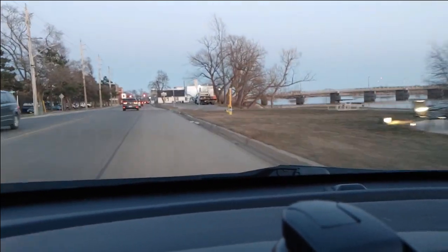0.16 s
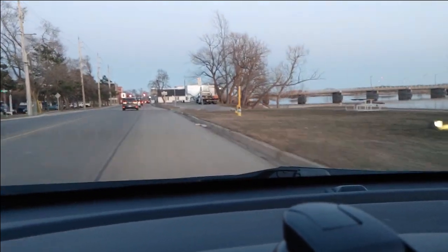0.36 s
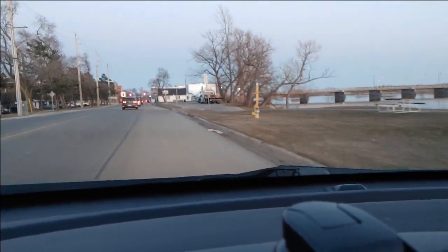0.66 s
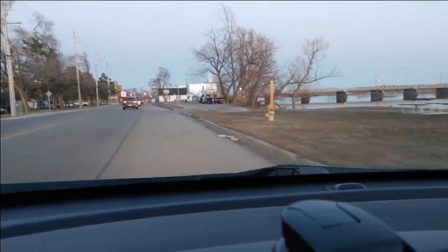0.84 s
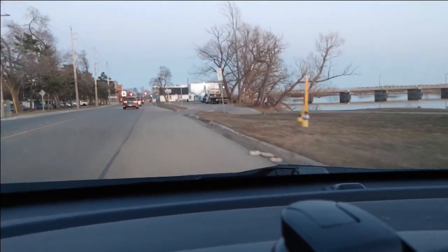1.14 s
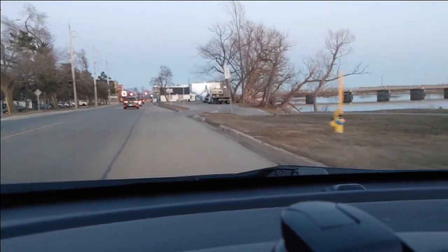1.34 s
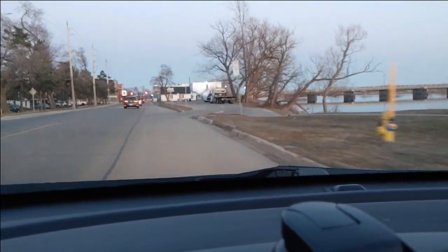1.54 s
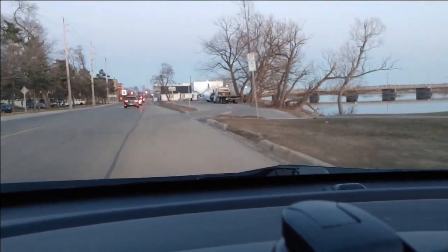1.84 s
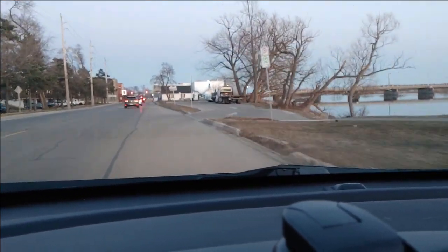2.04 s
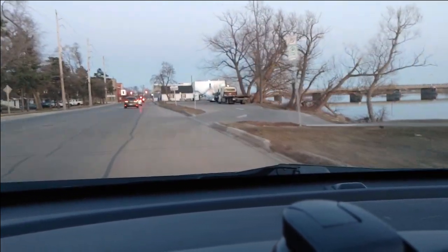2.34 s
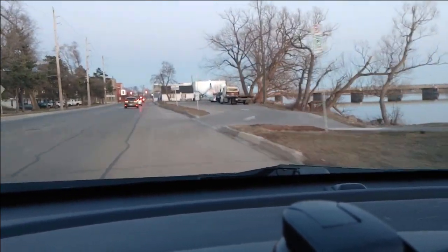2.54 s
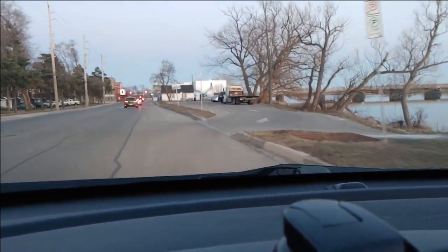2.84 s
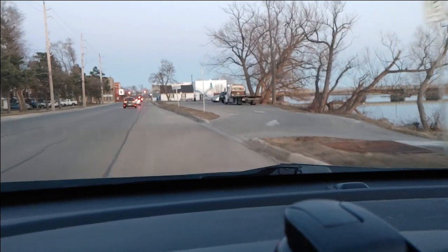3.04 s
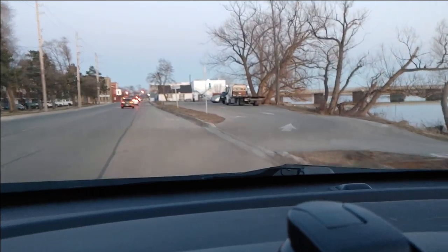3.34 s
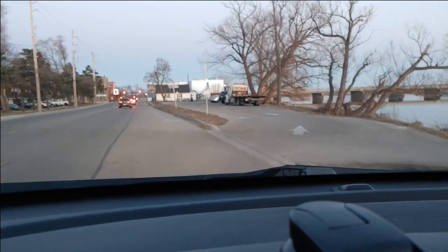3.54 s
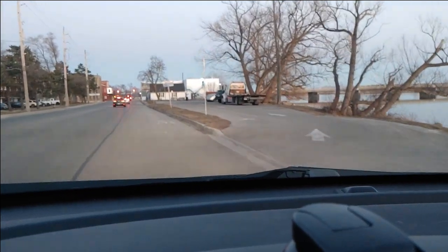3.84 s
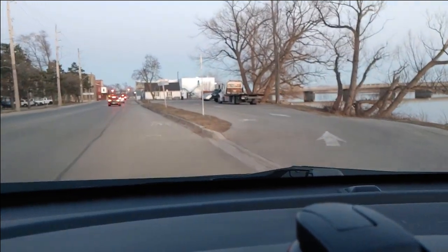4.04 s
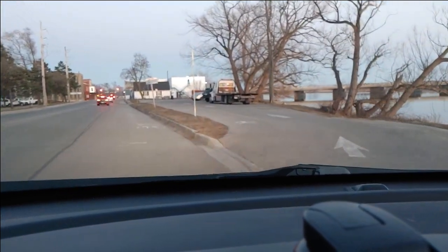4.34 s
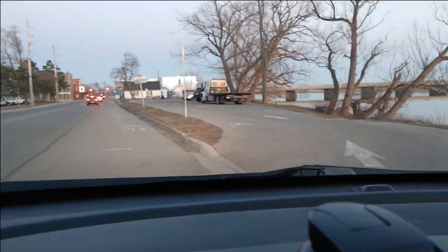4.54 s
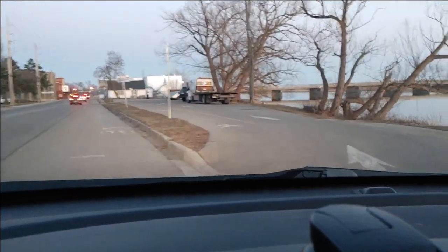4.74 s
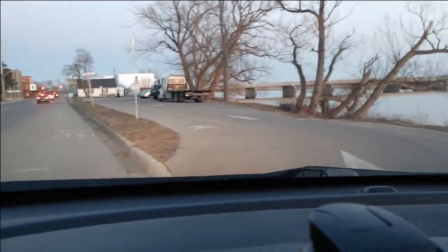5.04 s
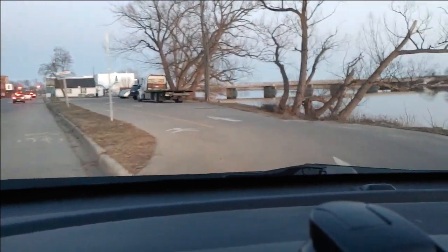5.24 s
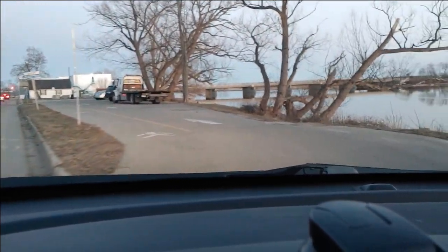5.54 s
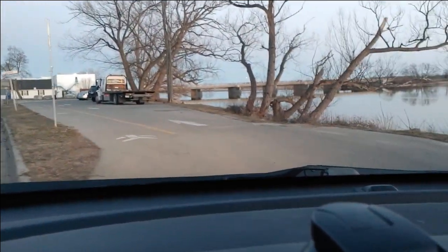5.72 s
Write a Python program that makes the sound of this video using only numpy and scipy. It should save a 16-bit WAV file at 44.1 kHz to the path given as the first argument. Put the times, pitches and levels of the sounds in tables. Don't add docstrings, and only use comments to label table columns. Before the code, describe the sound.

Inside a closed car, heard close to the dashboard in wide stereo, for nearly six seconds. From the start a hollow, wavering tyre hum around 320-400 Hz lies over low road rumble and faint air hiss. Soft joint thuds come at 0.2-0.5 s. At about 1.36-1.44 s the indicator stalk snaps over with a double plastic clack; from 1.8 s the relay ticks every 0.7 s, each followed by a tock about 0.36 s later. The hum keeps sliding down, making panels boom as it passes their pitches. Between 2.3 and 3.1 s the engine climbs gently while a hand rubs the wheel. A strong double thud lands at 3.35 s, a crisp plastic snap at 4.35 s. The engine coasts down from 3.9 to 5 s; skin and cuff rustle at 4.5-5.5 s with small creaks. The road fades towards a soft blower hum, with a last soft bump at 5.7 s.

```python
import sys
import numpy as np
from scipy import signal
from scipy.fft import rfft, irfft
from scipy.io import wavfile
from scipy.ndimage import map_coordinates

SR = 44100
rng = np.random.default_rng(int(sys.argv[2]) if len(sys.argv) > 2 else 0)


def volts(x):
    e = np.asarray(x, float) / 20
    return 10 ** e


def to_wav(s):
    ch = np.atleast_2d(s).T
    pcm = np.round(np.clip(ch, -1, 1) * 32767)
    wavfile.write(sys.argv[1], SR, pcm.astype(np.int16))


N = 259308
HZ = np.maximum(np.arange(N // 2 + 1) * SR / N, 1)
CRUISE_TURNS_PER_S = 6.7


def rms_one(x):
    return x / np.sqrt(np.mean(x ** 2) + 1e-20)


def in_time(rows):
    time_s, *columns = np.transpose(rows)
    return [np.interp(np.arange(N) / SR, time_s, column) for column in columns]


def at_hz(points):
    hz, value = np.transpose(points)
    return np.interp(np.log(HZ), np.log(np.maximum(hz, 1)), value)


def add(out, start_s, sound):
    i = round(start_s * SR)
    out[..., i:i + sound.shape[-1]] += sound[..., :N - i]


def drift(rate, step=1):
    r = np.exp(-80 * np.pi * rate / SR)
    chance = rng.standard_normal(N // 40 + 2002)
    slow = signal.lfilter([1], [1, -2 * r, r * r], chance)[2000:]
    return np.interp(np.arange(0, N, step) / 40, np.arange(len(slow)), rms_one(slow))


def resonance(x, hz, width_hz):
    r = np.exp(-np.pi * width_hz / SR)
    zeros = np.array([1, 0, -1]) * (1 - r * r) / 2
    return signal.lfilter(zeros, [1, -2 * r * np.cos(2 * np.pi * hz / SR), r * r], x)


def body(x, modes):
    return sum((-1) ** k * volts(db) * resonance(x, hz, width_hz) for k, (hz, width_hz, db) in enumerate(modes))


def noise(spectrum, patchy_db):
    _, _, cells = signal.stft(rng.standard_normal((2, N)), nperseg=1024)
    frames = cells.shape[-1]
    coarse = rng.standard_normal((44, frames // 6 + 2))
    row = 43 * np.log1p(np.arange(513)) / np.log(514)
    place = np.meshgrid(row, np.arange(frames) / 6, indexing="ij")
    patches = volts(patchy_db * map_coordinates(coarse, place, order=1))
    mottled = signal.istft(cells * patches, nperseg=1024)[1][:, :N]
    coloured = irfft(rfft(mottled) * volts(at_hz(spectrum)), N)
    return rms_one(coloured * volts(.6 * drift(9)))


def stroke_db(t, peak_s, peak_db, swell_s, fade_s):
    contact_db = peak_db - 20 * ((t - peak_s) / np.where(t < peak_s, swell_s, fade_s)) ** 2
    return np.maximum(contact_db, -200)


TREAD_DB = [-9.5, -19.5, -8.5, -11.5, -8, -6.5, 0, -1.3, -9, -5, 3.2, -5, -3.5, -1, -12, -7.5, -8, -7, -12,
            -13]
# crest_s, lift_db, length_s
ORDER_SWELLS = [(0.14, 4, .7), (.25, 5.5, .6), (.95, 3, 0.93), (1.35, 6, .6), (1.5, 4.5, 0.5),
                (1.85, 5.5, .7), (2.1, 3, .6), (2.2, 4.5, .6), (2.6, 10.5, 0.93), (1.7, 9, .5),
                (1.8, -4.5, .8), (.4, -5, .9)]
SWELLING_ORDERS = [58, 48, 54, 55, 59, 61, 54, 65, 64, 56, 58, 50]
FIRST_ORDER = 48


def tread(turns, waver_db):
    angle = 2 * np.pi * np.cumsum(turns)[::12] / SR
    t = np.arange(len(angle)) * 12 / SR
    out = 0
    for k, db in enumerate(TREAD_DB):
        order = FIRST_ORDER + k
        for (crest_s, lift_db, length_s), swelling in zip(ORDER_SWELLS, SWELLING_ORDERS):
            if swelling == order:
                db = db + lift_db * np.cos(np.pi * np.clip((t - crest_s) / length_s, -.5, .5))
        phase = order * angle + np.pi * k ** 3 / 11 + .25 * drift(.8, 12)
        pair = np.sin(order // 2 * angle + rng.uniform(0, 2 * np.pi))
        shape = np.sin(phase) + volts(-10.5) * pair + volts(-10.5) * np.sin(2 * phase)
        waver = drift(1, 12) + .5 * np.array([drift(1, 12), drift(1, 12)])
        out = out + volts(db + waver_db * waver) * shape
    full = signal.resample_poly(out, 12, 1, axis=1)[:, :N]
    return rms_one(signal.sosfiltfilt(signal.butter(4, 425, fs=SR, output="sos"), full))


# pitch_hz, width_hz, level_db
CABIN = [(93.2, 25, 0.5), (144.8, 18, 3), (171.9, 15.9, 2), (234.4, 15.7, 3.5), (287.7, 12, 2.5),
         (331.4, 31, 7.5), (373, 56, 1.5)]


def cabin(x):
    run_in = np.concatenate([2 * x[..., :1] - x[..., 4000:0:-1], x], axis=-1)
    return body(run_in, CABIN)[..., 4000:]


# pitch_hz, density_db (per Hz)
RUMBLE = [(12, -48), (20, -20), (50, -10.5), (92, -7.5), (140, -2), (190, -12.5), (260, -26), (600, -80.5)]
# pitch_hz, density_db (per Hz)
DRONE = [(130, -20), (175, -1.5), (232, 3), (262, -2.5), (310, 5), (390, 0.5), (425, -14), (494, -12),
         (600, -19.5), (884, -22.5), (1160, -27), (1290, -34), (1700, -46), (2600, -95)]
# pitch_hz, density_db (per Hz)
FAN = [(320, -31.5), (450, -22.5), (562, -4.5), (686, -7.5), (1280, -14), (1460, -10.5), (1660, -32),
       (1730, -21.5), (2000, -22), (2600, -55), (4400, -120)]
ROAD_PATCHY_DB = 3.2


def road(speed_db, coarse_db):
    rumble = volts(-51.5 + coarse_db + 11.5) * noise(RUMBLE, ROAD_PATCHY_DB)
    drone_db = -50.5 + 1.7 * speed_db + .21 * coarse_db
    drone = volts(drone_db + 18) * noise(DRONE, ROAD_PATCHY_DB)
    blower = volts(-71.5 + 1) * noise(FAN, ROAD_PATCHY_DB)
    return rumble * volts(-8.5) + cabin(rumble) + drone + blower


# pitch_hz, density_db (per Hz)
RUSH = [(880, -22), (1500, -6.5), (2110, -11), (2670, -8.5), (4090, -17), (5510, -28.5), (7910, -31.5),
        (8980, -28), (11400, -33), (13000, -44.5)]
HISS_PATCHY_DB = 2.3


def rush(turns, speed_db, dull, bright):
    sleeve = bright ** 2 / dull * volts(-14)
    level = np.hypot(volts(-77 + .79 * speed_db), sleeve)
    hiss = level * volts(4) * noise(RUSH, HISS_PATCHY_DB)
    hiss += volts(-2 - 50 * (turns - 6.35) ** 2) * resonance(hiss, 2720, 90) * 1.6
    hiss[1] = volts(-7.5) * (2.34 * hiss[1] - .35 * hiss[0])
    return hiss


# pitch_hz, width_hz, level_db (at cruising speed)
CAVITY = [(232, 9, -45), (287, 10, -52)]


def cavity(speed_db):
    out = 0
    for hz, width_hz, db in CAVITY:
        ring = resonance(resonance(rng.standard_normal(N), hz, width_hz), hz, width_hz)
        out = out + volts(db) * rms_one(ring)
    return out * volts(.81 * speed_db + .94 * drift(2.3))


# crest_s, peak_db, pitch_hz, length_s
BOOMS = [(.15, -34, 232.3, .16), (.35, -32, 231.5, .18), (.53, -33.5, 229.9, 0.17), (.91, -35, 224.8, 0.16),
         (.99, -32, 178.2, 0.29), (1.27, -38, 173.6, 0.16), (2.82, -31.5, 234, 0.12),
         (2.93, -32.5, 233.6, .1), (3.14, -32, 244.2, .22), (3.32, -24.5, 234.5, 0.25),
         (3.58, -20, 229.4, .08), (3.68, -23, 233.4, .17), (3.91, -27.5, 227.4, .16),
         (4.05, -27.5, 178.8, 0.32), (4.13, -27, 233.6, .14), (4.27, -29, 174.2, 0.21),
         (4.48, -34, 175.4, .14), (4.6, -30.5, 174.3, .16), (4.87, -25.5, 144.8, .26),
         (5.38, -38, 116.7, .14), (2.71, -31, 313, .2), (2.5, -34, 322, .2), (2.7, -38, 180, .25),
         (4.219, -38.5, 74.9, .12), (4.491, -38.5, 70, .1), (5.3, -32.5, 98.5, .3), (3.68, -33, 177, .14)]


def booms():
    out = np.zeros(N)
    for crest_s, db, hz, length_s in BOOMS:
        t = np.arange(round(length_s * SR)) / SR
        add(out, crest_s - length_s / 2, volts(db) * np.sin(np.pi * t / length_s) * np.sin(2 * np.pi * hz * t))
    return out


# start_s, peak_db, pitch_hz, t60_s
BUMPS = [
    (0.179, -23, 107.5, 0.087),
    (0.256, -19, 182, 0.15),
    (.3, -20.5, 113.9, 0.24),
    (0.5, -16, 110, 0.14),
    (3.345, -18.5, 171.9, 0.16),
    (3.362, -12, 97.6, 0.14),
    (5.72, -26.5, 93.2, 0.15),
    (5.704, -35, 62.5, 0.15),
]


def bumps():
    out, t = np.zeros(N), np.arange(SR // 3) / SR
    for start_s, db, hz, t60_s in BUMPS:
        push = volts(db - 60 * t / t60_s) * (1 - np.exp(-t / .014))
        add(out, start_s, push * 2 * np.sin(2 * np.pi * hz * t))
    return out


# start_s, peak_db, centre_hz,
# width_hz, t60_s
DETENTS = [(1.3555, -72, 3800, 900, .05), (1.3641, -46, 3500, 1500, 0.055), (1.3645, -51, 7460, 900, 0.054),
           (1.366, -51.5, 1390, 1186, 0.077), (1.374, -49.5, 5500, 3900, 0.064),
           (1.385, -44.5, 880, 650, 0.045), (1.426, -53, 4500, 6000, 0.048),
           (1.4335, -48, 5600, 4000, 0.068), (1.4335, -47.5, 3130, 980, 0.07),
           (1.4376, -39, 1070, 800, 0.074), (1.4325, -47, 1200, 700, .05), (1.426, -51, 1300, 400, 0.045),
           (1.6, -46, 1100, 250, .06), (1.44, -37.5, 472, 199, 0.18), (1.455, -56, 4330, 503, 0.043),
           (1.455, -59.5, 6600, 4000, .08), (3.638, -59.5, 2600, 1300, 0.054),
           (3.639, -47.5, 1010, 910, 0.042), (3.638, -54.5, 5230, 500, .025),
           (3.64, -65, 5600, 2500, 0.054), (4.341, -44, 4250, 700, 0.03), (4.3442, -50, 6000, 9000, .03),
           (4.3476, -35.5, 4300, 4900, 0.025), (4.352, -39, 4700, 5500, 0.068),
           (4.348, -37, 2150, 900, 0.053), (4.348, -41, 1000, 900, 0.061), (4.35, -50, 11500, 2300, 0.06),
           (4.348, -24.5, 15100, 1246, .01), (2.0682, -51.5, 7350, 900, .03),
           (2.0685, -58.5, 6300, 500, .045), (2.0685, -53, 4630, 460, .025),
           (2.069, -64.5, 2750, 510, 0.059), (2.073, -64, 3800, 2500, 0.047), (.261, -46, 900, 450, .06),
           (.257, -54.5, 1550, 210, 0.056), (4.3478, -26.5, 5600, 5800, .004),
           (4.3488, -25.5, 4300, 4800, .004), (4.3502, -29.5, 5300, 6200, .004), (.256, -48, 590, 180, .07)]
# start_s, peak_db, centre_hz
CREAKS = [(.2445, -78, 3750), (4.801, -59, 2710), (.955, -53.5, 1117), (1.278, -71.5, 4100),
          (1.59, -57, 800), (3.339, -65.5, 2720), (3.613, -61, 853), (3.755, -62, 2900), (3.755, -72, 4500),
          (3.857, -68.5, 2720), (4.92, -55.5, 2850), (4.945, -55, 2870), (5.855, -59, 1350),
          (5.854, -68, 2920)]
# pitch_hz, width_hz, level_db
SHROUD = [(950, 130, 1.5), (1402, 41, 3), (2340, 540, -6.5), (2605, 54, 2), (2860, 110, 0.5),
          (3400, 150, 3), (3680, 210, 2.5), (4300, 320, 5), (4770, 140, -2), (5180, 270, 3),
          (6480, 89, -1.5), (7860, 190, 4.5), (11700, 150, 0.5)]


def snaps():
    out, t = np.zeros((2, N)), np.arange(SR // 6) / SR
    creaks = [(start_s, db, hz, .17 * hz, .042) for start_s, db, hz in CREAKS]
    for start_s, db, hz, width_hz, t60_s in DETENTS + creaks:
        grains = np.clip(rng.standard_normal(len(t) // 60 + 1), -1.5, 1.5)
        ragged = volts(4 * np.minimum(t / .006, 1) * np.repeat(grains, 60)[:len(t)])
        burst = ragged * rng.standard_normal((2, len(t)))
        burst = rms_one(resonance(resonance(burst, hz, width_hz), hz, width_hz))
        onset = np.sin(np.pi / 2 * np.minimum(t * hz / 2.2, 1)) ** 2
        add(out, start_s, burst * volts(db - 60 * t / t60_s) * onset)
    return volts(-7.5) * out + body(out + 1e-18, SHROUD)


def reflections(echo_db, t60_s):
    t = np.arange(SR // 10) / SR
    sparse = rng.standard_normal((2, len(t))) * (rng.random((2, len(t))) < .05)
    tail = sparse * volts(echo_db - 60 * t / t60_s)
    tail[:, 0] = 1
    return rfft(tail / np.sqrt(np.sum(tail ** 2, axis=1, keepdims=True)), N)


def relay(events, modes):
    out, t = np.zeros(N), np.arange(SR // 8) / SR
    for start_s, peak_db in events:
        hit = np.zeros(len(t))
        for (hz, db, t60_s), spread_db in zip(modes, rng.normal(0, 1.5, len(modes))):
            build = 1 - np.exp(-t * hz / 4)
            hit += volts(db + spread_db - 60 * t / t60_s) * build * np.sin(2 * np.pi * hz * t)
        rattle = resonance(rng.standard_normal(len(t)), 3500, 6000)
        hit += volts(-17 - 60 * t / .098) * np.minimum(t / .0048, 1) * rattle
        add(out, start_s - .002, volts(peak_db - 14.5) * hit)
        add(out, start_s + .0051, volts(peak_db - 22) * hit)
    return out


# pitch_hz, level_db, t60_s
TICK = [(605, -2.5, 0.1), (1065.4, 6.5, 0.082), (1320, -2, 0.048), (1738, -15.5, 0.05), (2275, -16, .03),
        (3620, -21, 0.04), (4024, -8.5, 0.03), (4100, -5, 0.037), (4553, -15.5, 0.069), (5500, -25, 0.05),
        (5700, -26.5, .05), (6420, -23, .045), (7900, -28, 0.04)]
# pitch_hz, level_db, t60_s
TOCK = [(811, -7, 0.045), (1065, 2, 0.041), (1304, -5.5, 0.033), (2660, -21.5, .05), (3400, -22.5, 0.027),
        (4300, -.6, 0.0242), (4710, -11, 0.05), (5450, -14, 0.04), (5770, -19, .04), (6200, -23, .03),
        (7240, -26, .04), (8100, -24, 0.05)]


def indicator():
    ticks_s = 1.7993 + .7011 * np.arange(6)
    closing = relay([(s, -38) for s in ticks_s], TICK)
    opening = relay([(s + .359, -35.5) for s in ticks_s], TOCK)
    return volts(12) * (closing + opening)


# time_s, firing_hz, level_db
SHIFT = [
    (2.25, 133, -71.5),
    (2.45, 136, -39.5),
    (2.75, 141.1, -37.5),
    (2.95, 145.4, -46.5),
    (3.15, 145.8, -73),
]
# time_s, firing_hz, level_db
COAST = [
    (3.75, 106, -69.5),
    (3.95, 101, -49.5),
    (4.3, 94, -45.5),
    (4.6, 88, -48),
    (4.9, 80, -49),
    (5.1, 74, -70.5),
]


def engine():
    (hz, db), (coast_hz, coast_db) = in_time(SHIFT), in_time(COAST)
    phase = 2 * np.pi * np.cumsum(hz) / SR
    climb = volts(db) * (np.sin(phase) + volts(5.5) * np.sin(2 * phase))
    coast = volts(coast_db) * np.sin(2 * np.pi * np.cumsum(coast_hz) / SR)
    return volts(1.6 * drift(4.6)) * (climb + coast)


# firmest_s, level_db, swell_s, fade_s, bright_minus_dull_db
STROKES = [
    (2.36, -70, 0.35, 0.34, 2),
    (2.62, -56.5, 0.35, 0.18, -4),
    (2.93, -75, 1, 0.17, 5),
    (3.351, -83, 0.23, .2, 4),
    (3.8, -76.5, 0.17, 0.081, 3),
    (4.85, -63, 0.68, 0.2, 4),
    (5.16, -74.5, 0.23, 0.086, 5),
    (5.36, -68, 0.08, 0.14, -0.5),
]


def hand():
    t, power = np.arange(N) / SR, 0
    resting = (5.35, -80.5, 6.4, np.inf, 2)
    for peak_s, db, swell_s, fade_s, bright_db in STROKES + [resting]:
        contact_db = stroke_db(t, peak_s, db, swell_s, fade_s)
        power = power + volts(2 * contact_db + np.array([[0], [2 * bright_db]]))
    return np.sqrt(power)


# pitch_hz, density_db (per Hz)
DULL_RUB = [(880, -48), (1500, -11.5), (2200, -31), (2750, -18.5), (3400, -15.5), (3850, -5), (4000, -9),
            (4250, -5), (4600, -11), (5050, 1.5), (5200, -3), (5400, 1.5), (5800, -9.5), (6200, -6),
            (7800, -30.5), (13200, -119)]
# pitch_hz, density_db (per Hz)
BRIGHT_RUB = [(3410, -45.5), (5800, -11), (6200, -6), (6440, 1.5), (6700, -5), (7100, -1), (7600, -4.5),
              (8300, -3.5), (9560, -11.5), (11800, -4.5), (12400, -10.5), (13000, -28)]


def rim_rub(dull, bright):
    dull_rub = dull * volts(2.5) * noise(DULL_RUB, HISS_PATCHY_DB)
    return dull_rub + bright * volts(3.5) * noise(BRIGHT_RUB, HISS_PATCHY_DB)


# firmest_s, level_db, swell_s, fade_s
CUFF = [
    (2.9, -82, .2, .3),
    (4.81, -72, .06, .12),
    (4.92, -73.5, 0.26, .09),
    (5.12, -74.5, .3, 0.17),
    (5.37, -65, 0.12, .07),
    (5.5, -74, .15, .12),
    (5.75, -79, 0.28, .4),
]


def cuff():
    t = np.arange(N) / SR
    power = sum(volts(2 * stroke_db(t, *drag)) for drag in CUFF)
    band = signal.butter(2, [1900, 4300], "band", fs=SR, output="sos")
    return np.sqrt(power) * rms_one(signal.sosfilt(band, rng.standard_normal((2, N))))


# time_s, wheel_turns_per_s
SPEED = [(0, 6.706), (.75, 6.36), (1.2, 6.11), (1.7, 5.715), (1.95, 5.505), (2.3, 5.215), (2.75, 4.85),
         (3.5, 4.2), (4.75, 2.84), (5.3, 1.98), (5.88, 1.5)]
# time_s, tread_hum_db, coarseness_db
DRIVE = [(0, -32.5, -2.5), (.3, -28.5, 5), (.65, -28.5, -1.5), (1.1, -28, -2), (1.4, -29, -1),
         (1.7, -31, -1), (2.0, -30, 0.5), (2.3, -32, -0.5), (2.7, -34.5, 2.5), (3.15, -34, 0.5),
         (3.55, -33.5, 2), (3.9, -38, 5.5), (4.45, -33.5, -3), (4.85, -35.5, 3.5), (5.3, -43.5, 5.5),
         (5.55, -45, -5.5), (5.88, -39.5, -4)]
# pitch_hz, share
LIKENESS = [(30, 1), (380, 0.5), (500, 0.092), (1100, 0.21), (2000, 1), (6000, 0.28), (13000, .3)]
# pitch_hz, difference_db
LEFT_LIFT = [(30, -7), (90, 8.5), (140, -2), (200, 3), (290, -3.5), (380, 5), (450, -3.5), (700, 3.5),
             (1100, 1.5), (1500, 2), (4000, 2), (12000, 0.5)]
RIGHT_LAG_S, RELAY_LAG_S = .0043, .00039


def scene():
    (turns,), (hum_db, coarse_db) = in_time(SPEED), in_time(DRIVE)
    speed_db = 20 * np.log10(turns / CRUISE_TURNS_PER_S)
    lean_db = 5.5 + 1.09 * (turns - CRUISE_TURNS_PER_S)
    dull, bright = hand()

    hum = volts(hum_db + 3.5) * cabin(tread(turns, waver_db=1.3))
    hum *= volts(-.1 * speed_db * drift(5.2))
    tonal = hum + bumps() + booms() + engine() + cavity(speed_db)
    low = rfft(tonal * volts([0 * lean_db, -lean_db]))

    echo = reflections(echo_db=-18, t60_s=.035)
    wide = rfft(road(speed_db, coarse_db) + rim_rub(dull, bright) + cuff())
    wide += rfft(snaps()) * echo[0] * volts(9)
    clicks = rfft(indicator()) * echo[1]

    alike = np.clip(at_hz(LIKENESS), 0, 1)
    left = wide[0] + low[0] + clicks
    right = (alike * wide[0] + np.sqrt(1 - alike ** 2) * wide[1]) * volts(-1.5) + low[1]
    right += clicks * volts(-3.5) * np.exp(-2j * np.pi * HZ * RELAY_LAG_S)
    right *= np.exp(-2j * np.pi * HZ * RIGHT_LAG_S) * volts(-at_hz(LEFT_LIFT))
    out = irfft(np.array([left, right]), N)
    lag = round(RIGHT_LAG_S * SR) + 8
    out[1, :lag] = 2 * out[1, lag] - out[1, 2 * lag:lag:-1]
    return out + rush(turns, speed_db, dull, bright)


def low_pass(x):
    return signal.sosfilt(signal.butter(12, 16300, fs=SR, output="sos"), x)


def record(dry):
    shelf = signal.cheby2(10, 30, 12900, fs=SR, output="sos")
    return low_pass(signal.sosfilt(shelf, dry))


dry = scene()
out = record(dry)
to_wav(out)
```